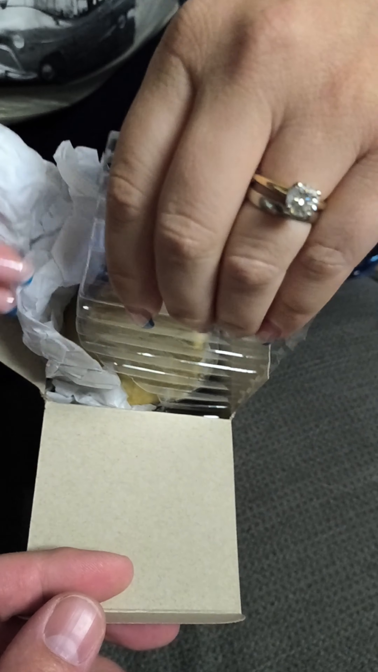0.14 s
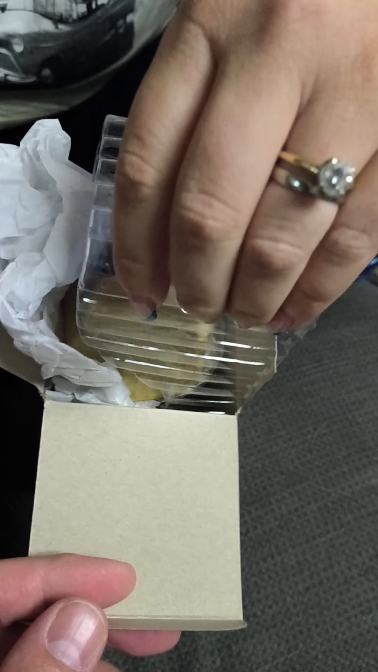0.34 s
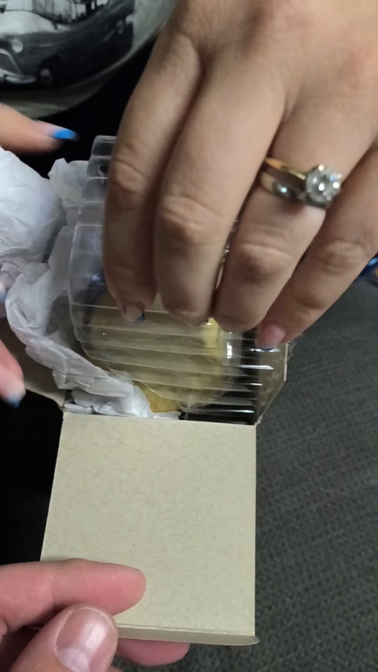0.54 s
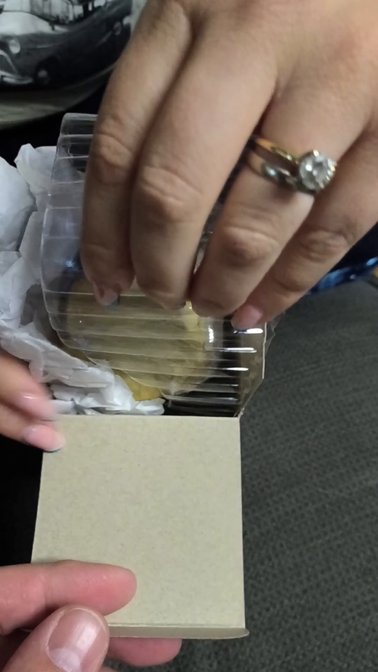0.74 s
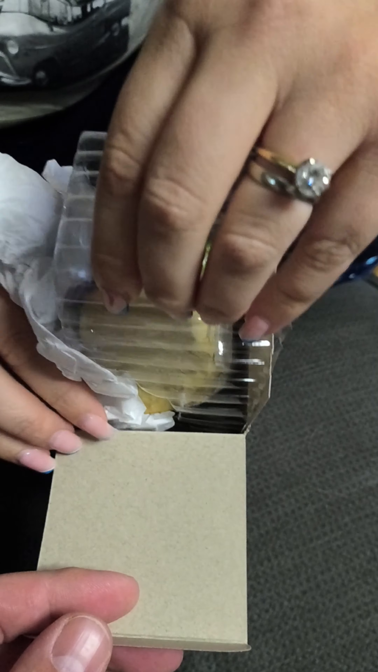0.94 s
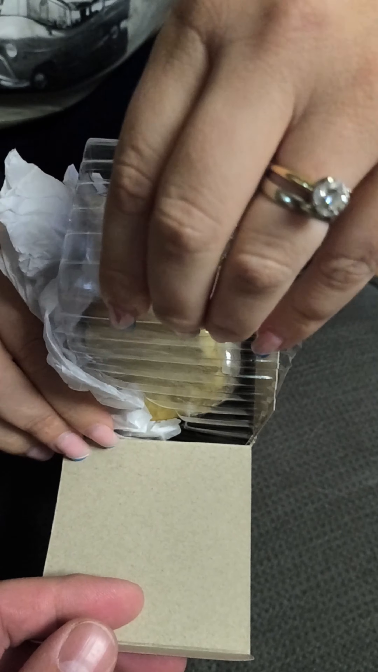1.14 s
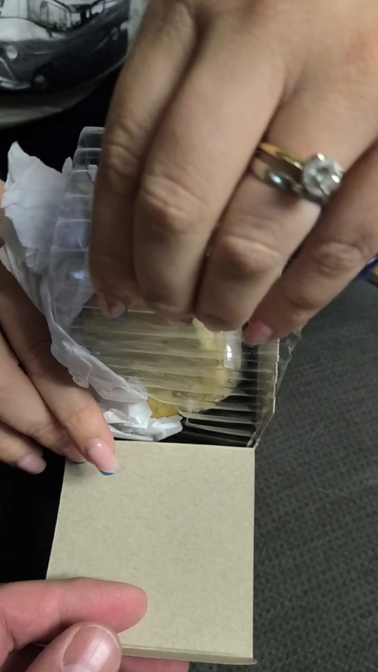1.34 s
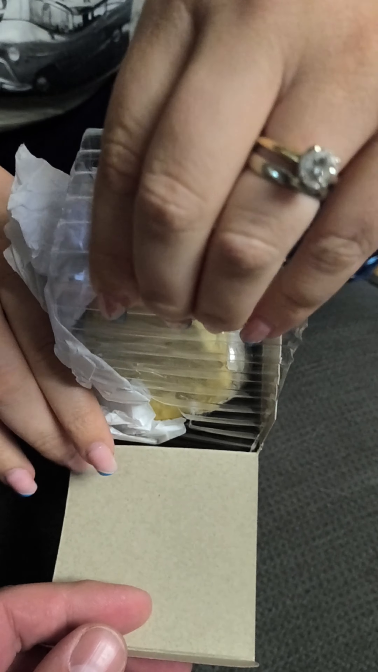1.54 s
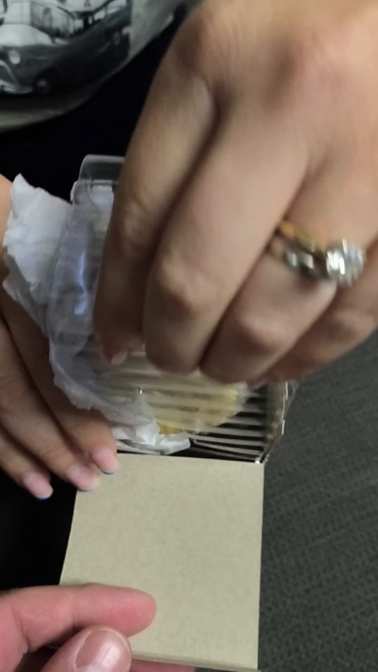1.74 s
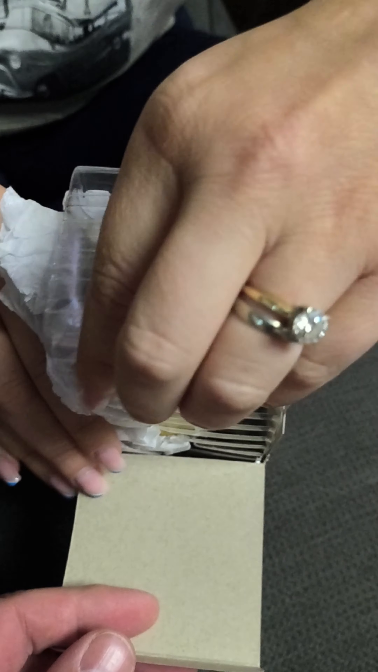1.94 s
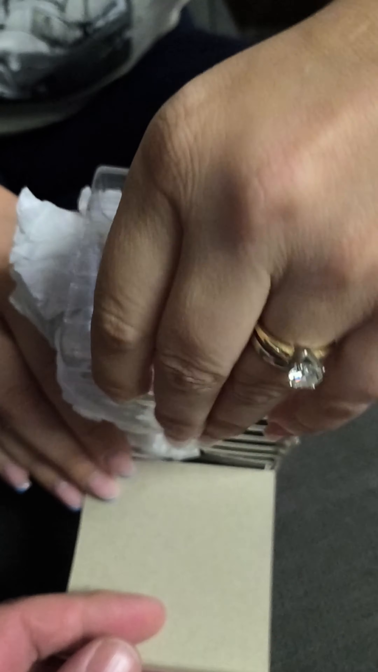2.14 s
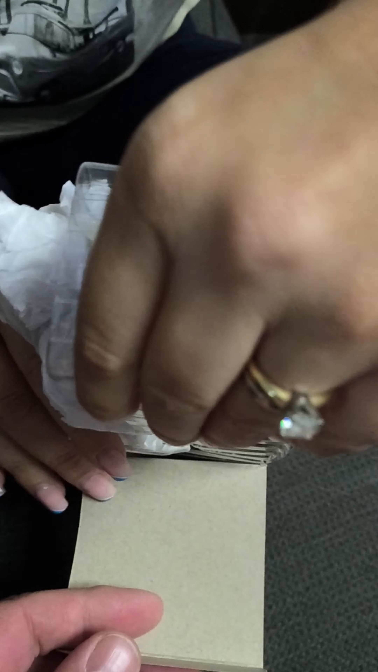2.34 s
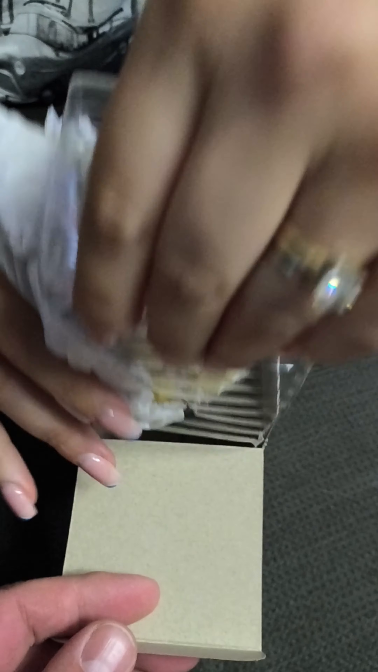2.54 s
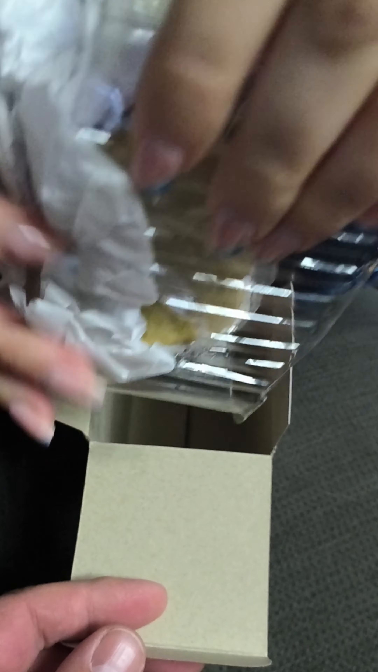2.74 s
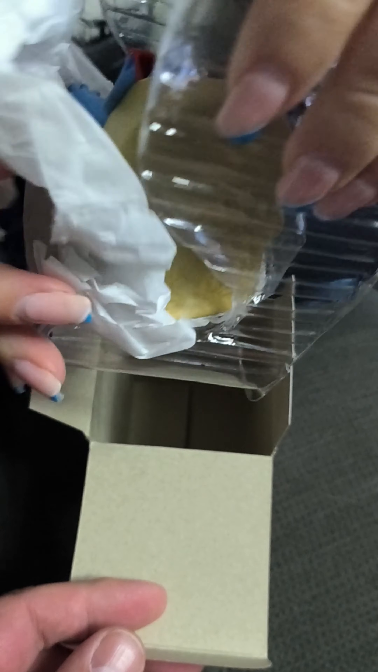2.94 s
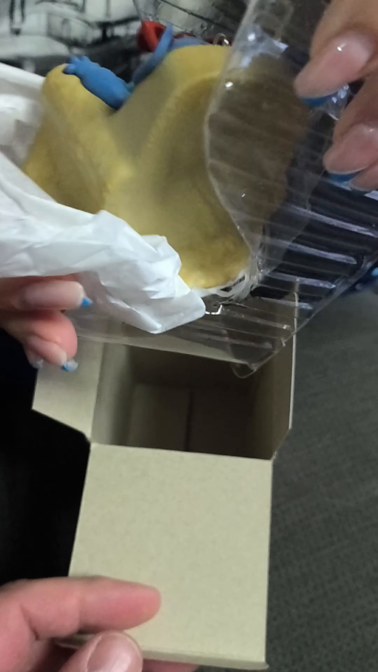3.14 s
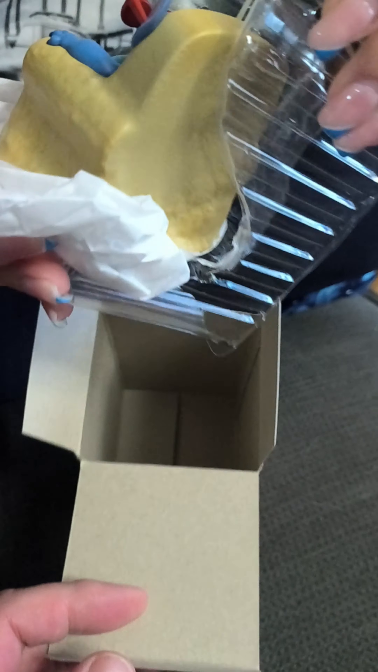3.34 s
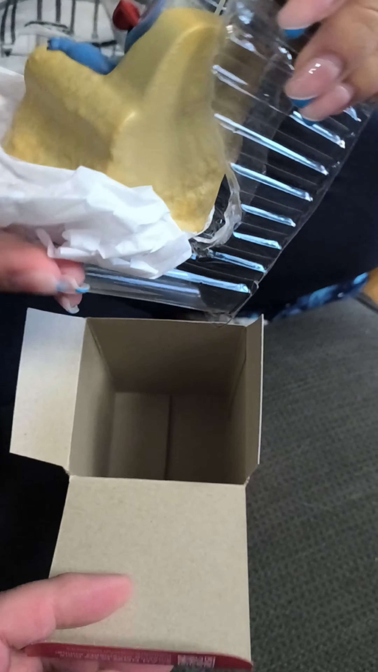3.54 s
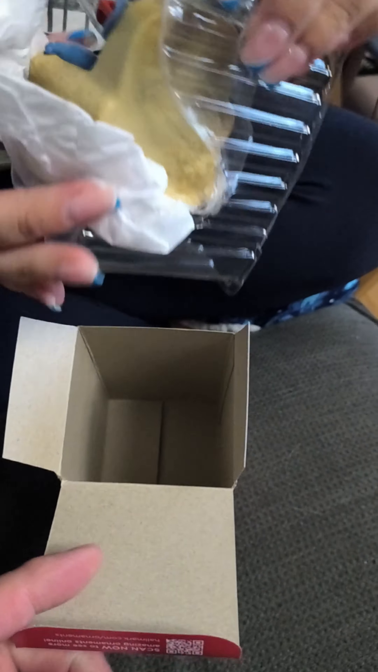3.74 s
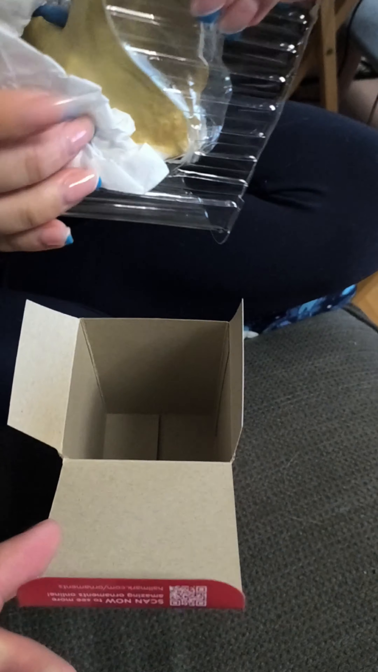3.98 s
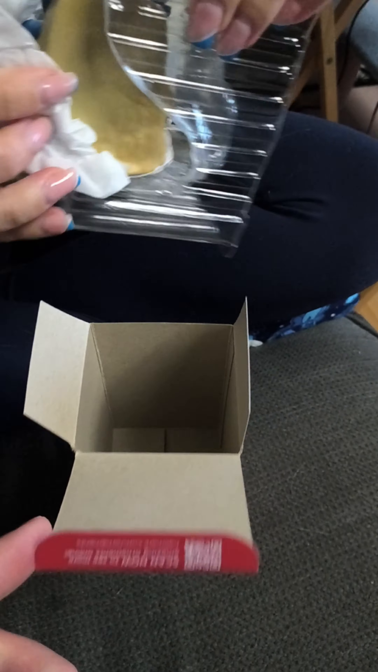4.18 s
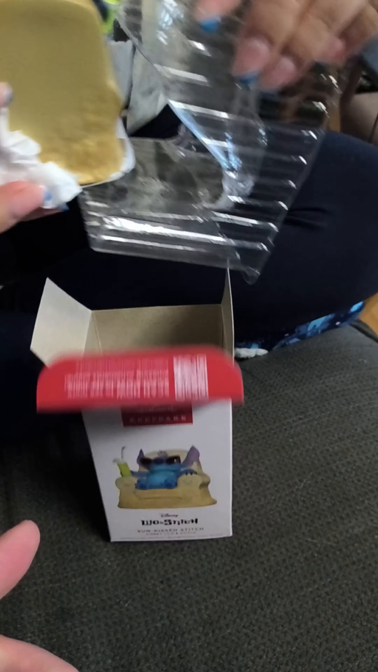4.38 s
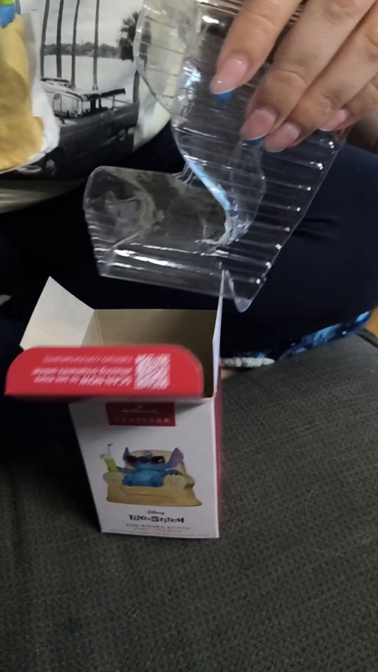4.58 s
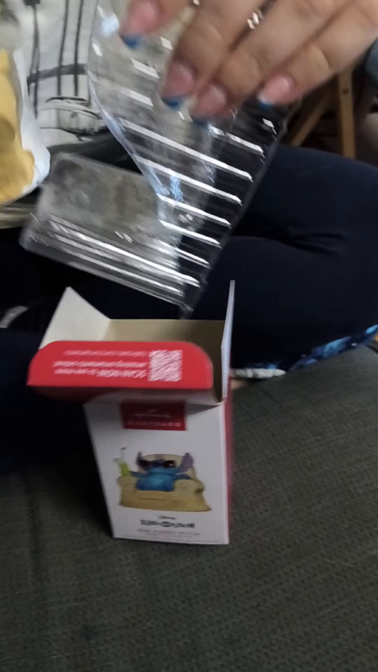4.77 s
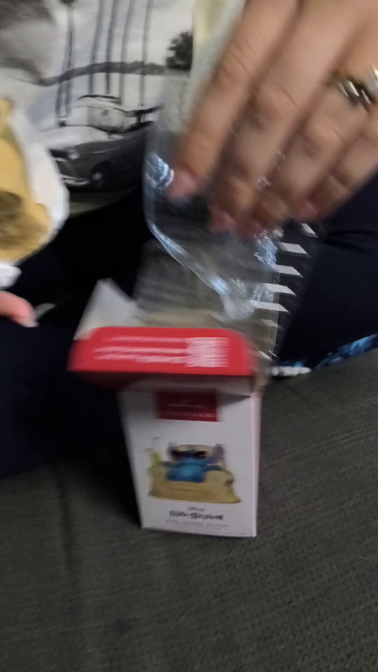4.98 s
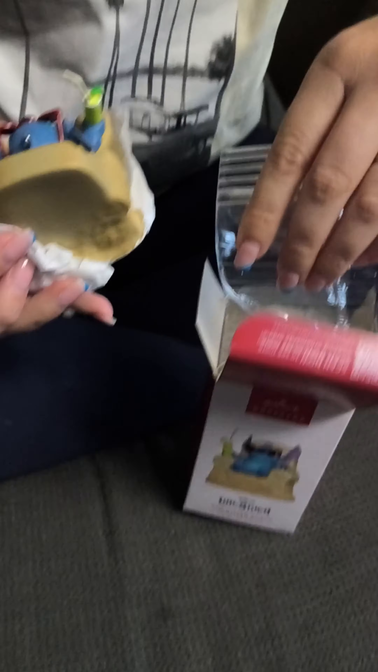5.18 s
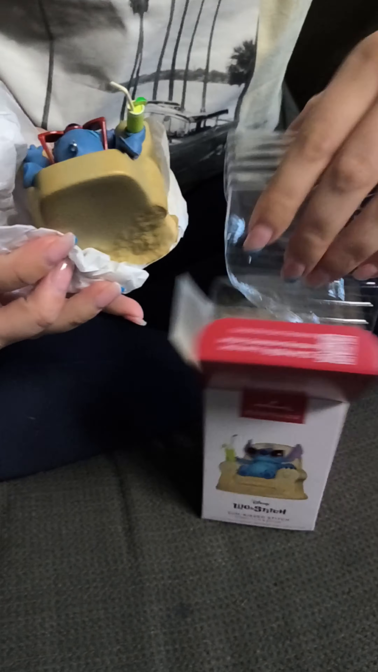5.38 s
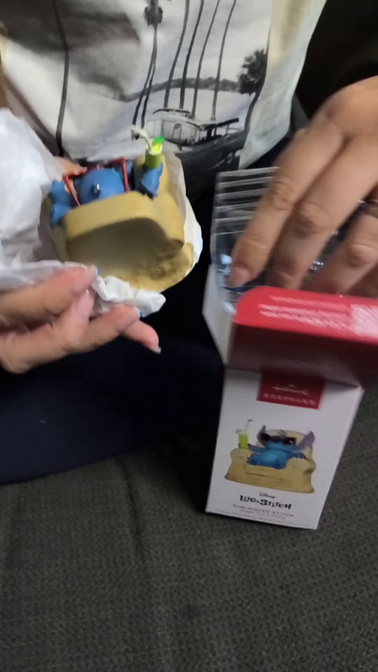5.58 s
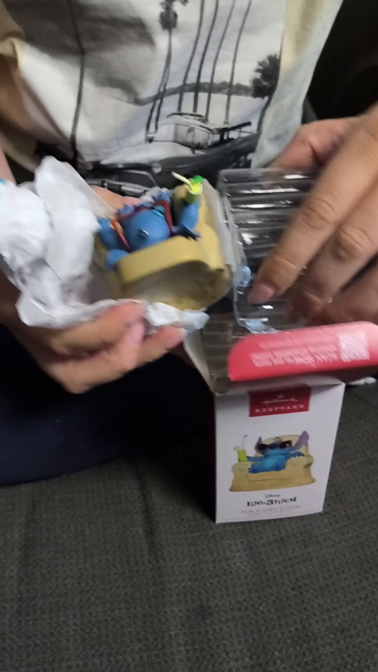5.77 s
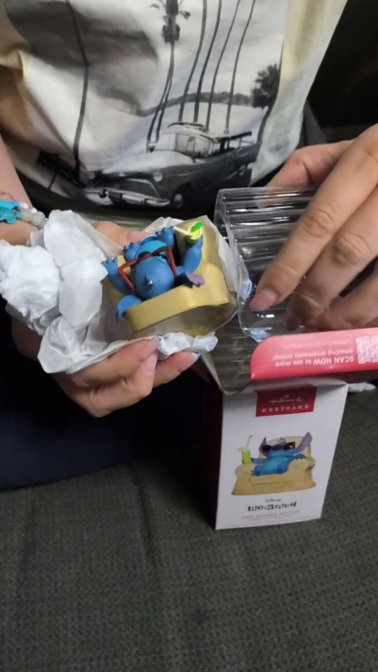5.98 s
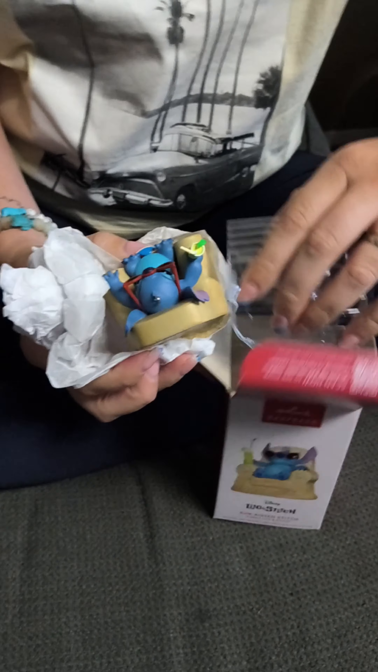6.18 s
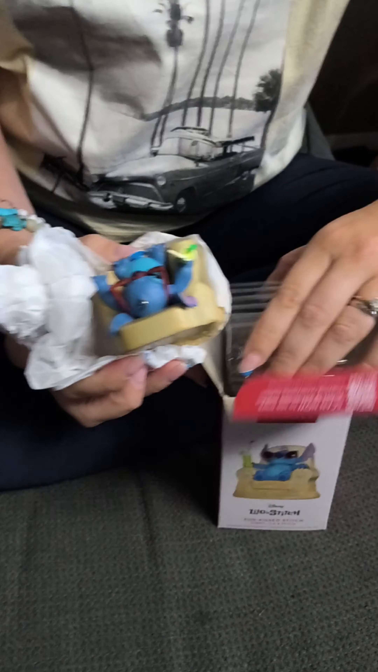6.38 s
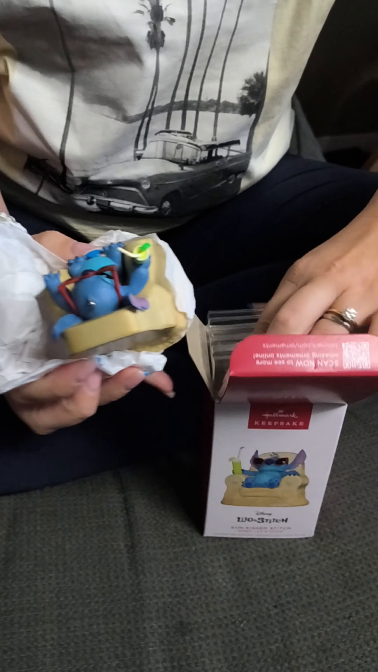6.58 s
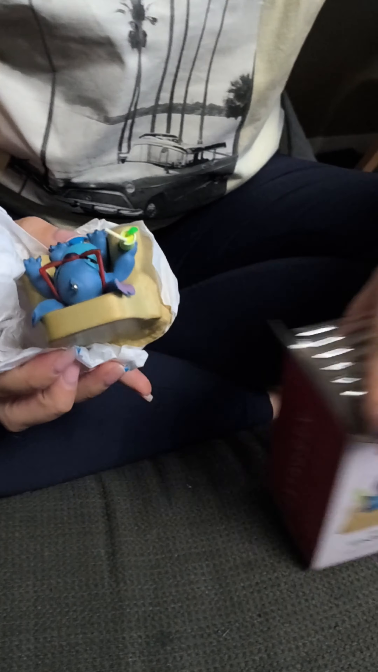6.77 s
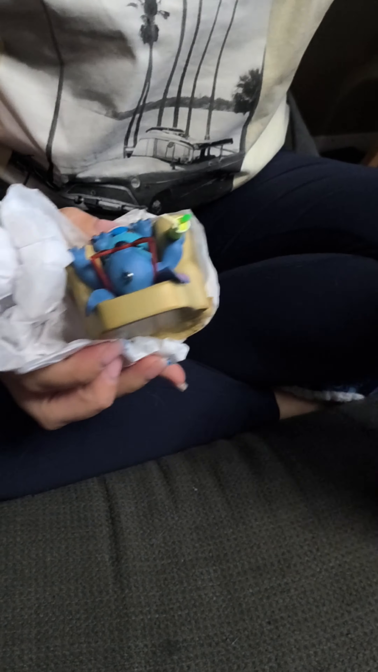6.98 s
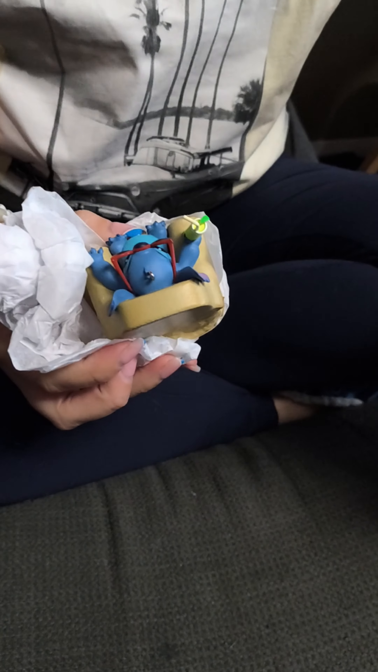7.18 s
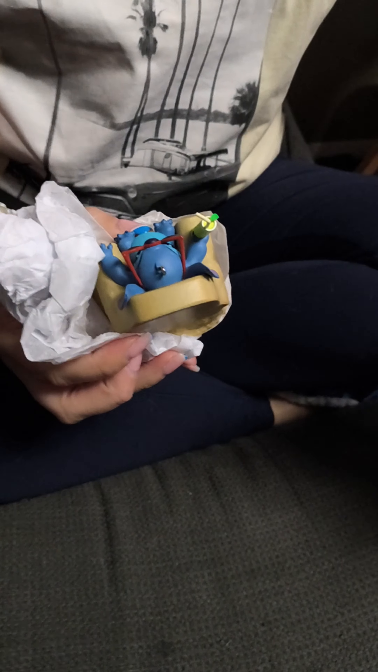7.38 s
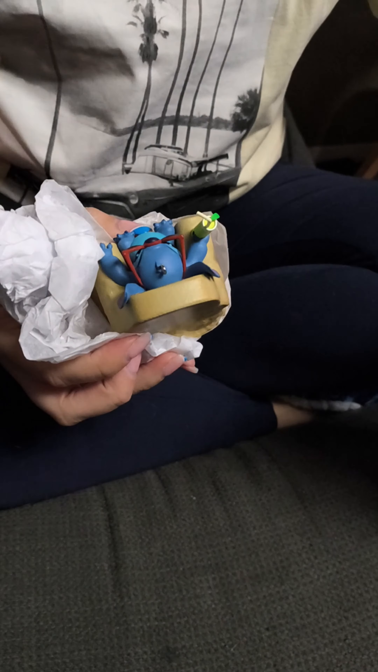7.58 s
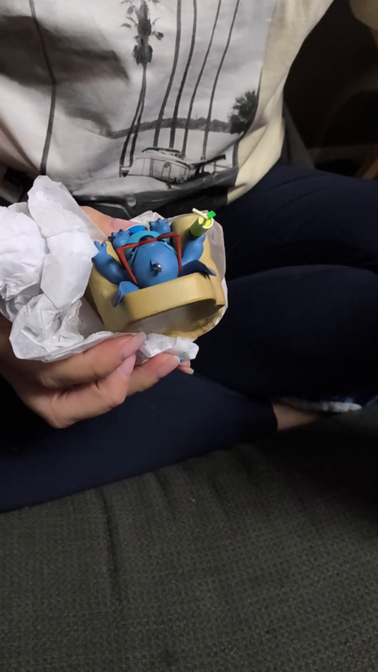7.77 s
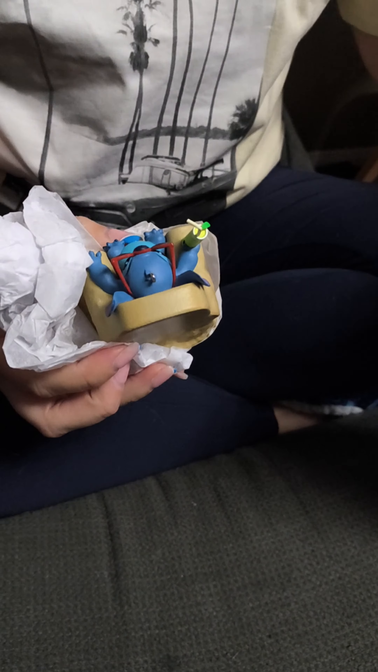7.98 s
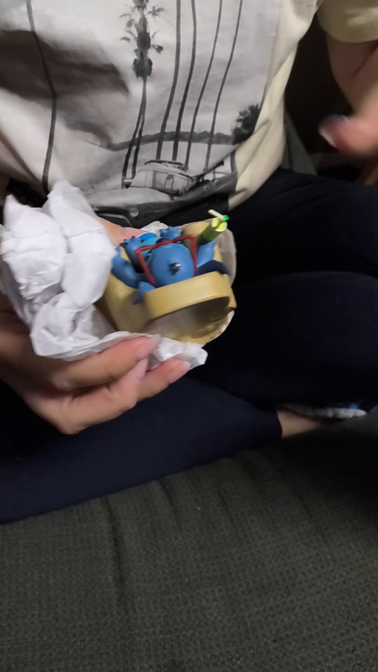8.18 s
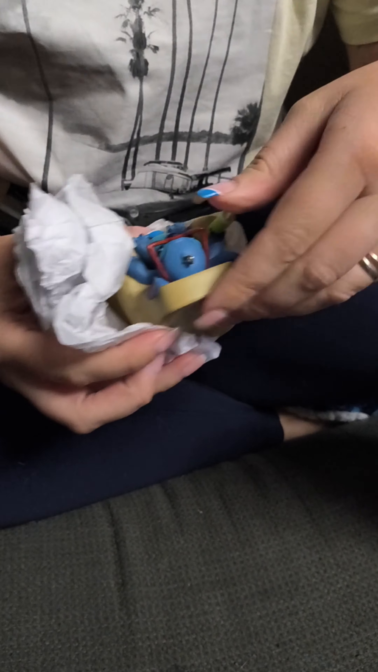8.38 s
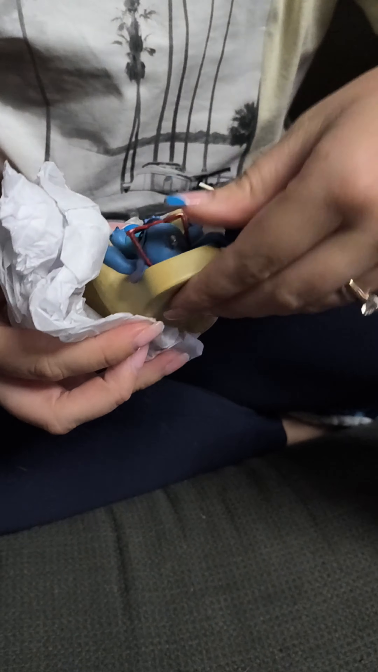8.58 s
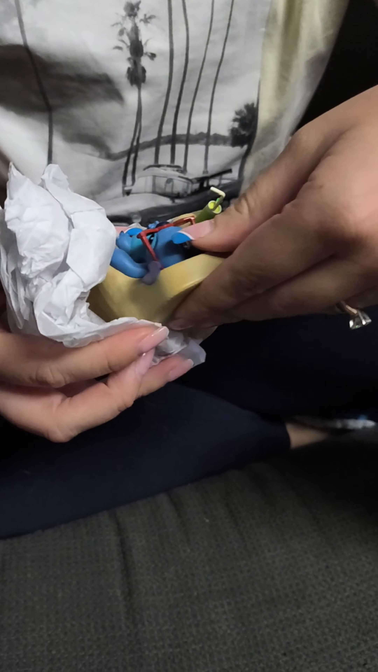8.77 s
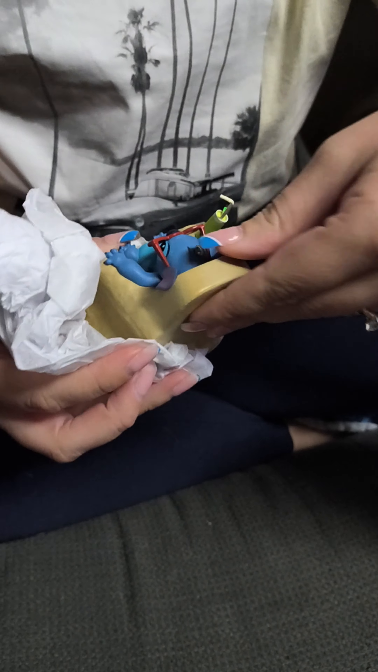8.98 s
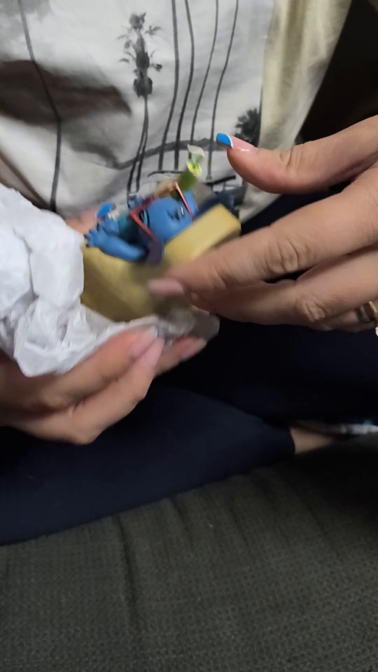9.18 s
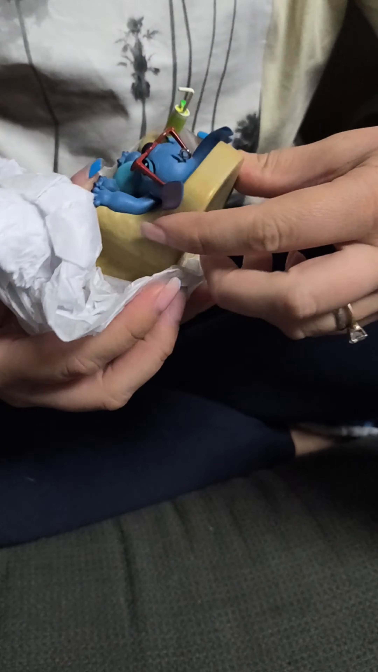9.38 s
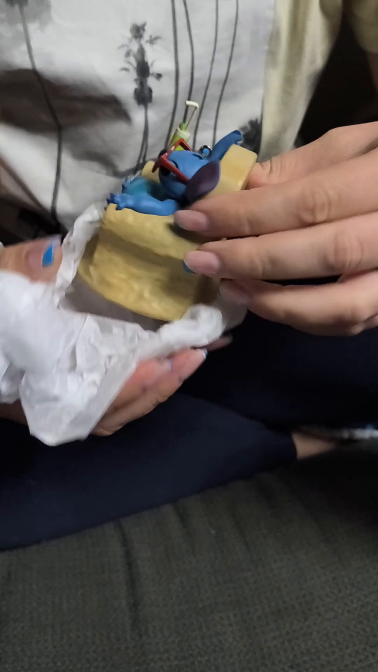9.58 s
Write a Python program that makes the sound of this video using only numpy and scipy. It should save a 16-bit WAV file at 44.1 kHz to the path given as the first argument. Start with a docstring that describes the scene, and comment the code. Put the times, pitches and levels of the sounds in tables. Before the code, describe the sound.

Hands scrape a plastic tray in a small hollow cardboard box while tissue paper crackles and snaps close by in a quiet room.

```python
"""Uneven scraping, rustling and sharp snaps close by: hands slide a ribbed plastic tray in and out of a small
cardboard box and crumple tissue paper, near a phone in a quiet, soft room. Rubbing forces drive the resonances
of the hollow box; the paper is clumped crackle with popping creases. Thin whistles are narrow gliding bands of
noise, soft bumps are short low swings, and a brief echo and wandering room tone lie behind."""
import sys
import numpy as np
from scipy import signal
from scipy.fft import rfft, irfft, next_fast_len
from scipy.io import wavfile
from scipy.ndimage import map_coordinates

SR = 44100
rng = np.random.default_rng(int(sys.argv[2]) if len(sys.argv) > 2 else 0)


def bounce(signal):
    """Save signal as a 16-bit WAV file at the path given by the first command-line argument."""
    frames = np.transpose(np.atleast_2d(signal))
    limited = np.clip(frames, -1, 1)
    pcm = np.round(limited * 32767).astype(np.int16)
    wavfile.write(sys.argv[1], SR, pcm)


N = 424233

# Resonances of the box with the tray half in [f/Hz, width/Hz, level/dB]
TRAY_HALF_IN = [(540, 84, -5), (640, 47, -3.5), (850, 300, -8.5), (1050, 230, -3.5), (1340, 140, -3),
                (1710, 150, -9.5), (2440, 50, -10.5), (3370, 430, -24.5)]
# Resonances of the box with the tray at its mouth [f/Hz, width/Hz, level/dB]
TRAY_AT_MOUTH = [(640, 250, -10), (1086, 150, -1), (1477, 87, -1), (2490, 200, -13.5), (3200, 290, -11.5)]
# Resonances of the box with the tray pushed home [f/Hz, width/Hz, level/dB]
TRAY_HOME = [(239, 62, -13.5), (663, 85, -4.5), (1000, 113, -4), (1070, 204, -6.5), (1448, 90, -6),
             (1604, 110, -8.5), (2400, 130, -15), (2850, 520, -16.5), (3610, 220, -11)]
# When the tray changes place, in the order of the three tables above [t/s]
TRAY_MOVES = [4.5, 5.9]
# Tone color of the tissue paper [f/Hz, level/dB]
PAPER_TONE = [(200, -28.5), (700, -16), (1500, -8.5), (2500, -6.5), (4500, 0), (7000, 1), (12000, -0.5),
              (16000, -6)]


def box():
    """The tray drives the hollow box by uneven scrapes, even squeaks and light rubbing."""
    return scrapes_and_pushes() + squeaks() + light_rubbing()


def scrapes_and_pushes():
    """The tray's ribs drag on the box in small irregular slips, each stroke favouring one mode of the box."""
    # Drags that weaken [t/s, length/s, level/dB, loudest mode f/Hz]
    scrape_rows = [(0.027, 0.014, -44.5, 540), (0.489, 0.013, -50, 1070), (0.752, 0.085, -51.5, 1330),
                   (0.809, 0.0012, -12.5, 1490), (0.845, 0.024, -45.5, 640), (0.896, 0.0028, -32, 1200),
                   (0.934, 0.048, -38.5, 1000), (1.031, 0.00078, -30.5, 770), (1.036, 0.052, -52, 900),
                   (1.081, 0.0053, -46, 1050), (1.168, 0.013, -46, 1050), (1.183, 0.033, -42, 1050),
                   (1.225, 0.041, -38.5, 1144), (1.374, 0.045, -39.5, 1060), (1.436, 0.16, -44, 1010),
                   (1.571, 0.013, -33, 1020), (1.594, 0.0076, -42, 1000), (1.634, 0.0065, -30.5, 950),
                   (1.655, 0.024, -34, 950), (1.69, 0.0068, -32, 1000), (1.697, 0.0035, -32.5, 970),
                   (1.827, 0.013, -48, 820), (1.857, 0.051, -46.5, 840), (1.913, 0.079, -45.5, 1050),
                   (1.986, 0.04, -41, 950), (2.055, 0.0024, -33.5, 1370), (2.179, 0.0086, -41, 1200),
                   (2.201, 0.002, -40.5, 1090), (2.299, 0.049, -48, 1110), (2.364, 0.07, -37.5, 1050),
                   (2.398, 0.025, -30.5, 1320), (2.439, 0.005, -22.5, 1285), (2.446, 0.037, -39.5, 556),
                   (2.558, 0.014, -36, 850), (2.569, 0.042, -41, 584), (2.674, 0.019, -52.5, 545),
                   (2.713, 0.022, -34, 1400), (3.059, 0.023, -45.5, 990), (3.34, 0.0026, -30.5, 800),
                   (3.467, 0.004, -33, 970), (5.008, 0.0048, -22, 1250), (5.158, 0.0064, -31.5, 1490),
                   (5.167, 0.014, -31, 1520), (5.227, 0.07, -40, 1460), (5.258, 0.0082, -29.5, 1450),
                   (5.287, 0.008, -49, 1410), (5.314, 0.077, -48, 1370), (5.413, 0.033, -51.5, 540),
                   (5.538, 0.019, -49, 1570), (5.61, 0.0094, -47.5, 1450), (5.651, 0.16, -47, 1370),
                   (5.707, 0.038, -32, 1420), (5.72, 0.07, -31, 1586), (5.771, 0.067, -42.5, 1270),
                   (5.956, 0.047, -53.5, 640), (6.005, 0.017, -41, 1340), (6.178, 0.0084, -47.5, 1660),
                   (6.2, 0.0071, -51, 1480), (6.224, 0.045, -32.5, 1370), (6.305, 0.052, -42, 1390),
                   (6.348, 0.11, -28, 1560), (6.421, 0.1, -29, 1450), (6.533, 0.015, -32.5, 970),
                   (6.537, 0.047, -34.5, 663), (6.606, 0.013, -33, 1550), (6.633, 0.0084, -37, 690),
                   (6.701, 0.037, -31, 667), (6.753, 0.029, -41, 624), (6.811, 0.01, -38.5, 1450),
                   (7.173, 0.0082, -35.5, 1500), (7.299, 0.0085, -36.5, 670), (7.308, 0.0051, -28, 1510),
                   (7.309, 0.004, -28.5, 640), (7.323, 0.0052, -29, 640), (7.338, 0.0022, -22.5, 1140),
                   (7.343, 0.0055, -32, 580), (7.354, 0.084, -54, 593), (7.415, 0.012, -35.5, 560),
                   (7.436, 0.008, -33.5, 1150), (7.451, 0.014, -33.5, 560)]
    # Drags that build up [t/s, length/s, level/dB, loudest mode f/Hz]
    push_rows = [(2.598, 0.12, -48.5, 1365), (6.649, 0.064, -48.5, 645), (7.365, 0.072, -52.5, 554)]
    scrape_sag_db, push_gain_db = 8, 5  # change of level until the stroke lets go
    table = np.array(scrape_rows + push_rows)
    sag_db = np.repeat([scrape_sag_db, -push_gain_db], [len(scrape_rows), len(push_rows)])[:, None]
    chance, size = rng.random((2, len(table), 8192))
    slips = (chance < 1200 / SR) * amp(0.88 * size)  # about 1200 slips a second
    force = slips + 0.17 * (size - .5)
    force[:, 60] += 4  # the first slip breaks the grip
    mode_hz = table[:, 3]

    def favoured(f):
        # a broad contact that drives a low mode is also softer, so duller
        softness = (1 + 1j * f / (3.5 * mode_hz[:, None])) ** 2
        return (1 + amp(8.0) * patch(f, mode_hz, 100)) / softness
    return strokes(table, sag_db, force, favoured)


def squeaks():
    """Regular slips, one a cycle at a slowly falling rate, give the box a pitched squeak."""
    # Even slips [t/s, length/s, level/dB, starting slip rate f/Hz]
    rows = [(1.535, 0.035, -33, 543)]
    table = np.array(rows)
    sag_db, slowing_per_s = 12.5, 1.17  # slowing: share of the starting rate lost each second
    t = np.arange(8192) / SR
    turns = table[:, 3:] * t * (1 - slowing_per_s * t / 2)
    slips = np.diff(np.floor(turns), prepend=-1)
    return strokes(table, sag_db, slips, lambda f: 1 / (1 + 1j * f / 1500))


def light_rubbing():
    """Light contact of tray and card makes fine crackle, coloured by the box with the tray in its current place."""
    # Strength of the contact, before the final gain [t/s, level/dB]
    contact = [(0, -69.5), (.75, -67), (1.04, -48), (1.3, -66.5), (1.52, -53), (2.25, -66), (2.47, -50),
               (2.54, -44), (2.85, -72.5), (3.29, -57), (4.66, -76.5), (5.09, -74.5), (5.25, -67.5),
               (6.05, -65), (6.45, -31), (6.6, -38), (6.78, -47), (6.9, -62), (7.42, -58), (7.85, -76),
               (9.62, -70)]
    contact_db, = curves(contact)
    touch = amp(contact_db) * crackle(rate=830, spread_db=2.2, clump_db=5.0, clump_rate=55, hiss=0.35)
    place = np.searchsorted(TRAY_MOVES, np.arange(N) / SR)
    murmur = sum(filtered(touch * (place == k), modes(table))
                 for k, table in enumerate((TRAY_HALF_IN, TRAY_AT_MOUTH, TRAY_HOME)))
    return amp(17.0) * murmur


def strokes(table, sag_db, force, favoured):
    """Each stroke starts quickly, changes in level and lets go, heard through the box at its own level."""
    start, length, db = table[:, :3].T[:, :, None]
    onset_share = 0.11  # longer strokes also start more slowly
    t = np.arange(force.shape[1]) / SR
    sag = sag_db * np.clip(t / length, 0, 1)
    let_go = 60 * np.clip(t - length, 0, 1) / 0.03  # 60 dB down in 0.03 s
    shape = amp(db - sag - let_go)
    shape = shape * (1 - np.exp(-t / (0.00026 + onset_share * length)))
    rung = hollow(shape * force, start[:, 0], favoured)
    level = np.sqrt(np.sum(shape ** 2, 1) / np.sum(rung ** 2, 1))
    return summed(start[:, 0], rung * level[:, None])


def hollow(rows, times, favoured):
    """Rows of force ring the box, whose modes depend on the tray's place and shift a little with each grip."""
    grip_shift = .03  # scatter of the box's pitch, as a share
    f = np.fft.rfftfreq(rows.shape[1], 1 / SR)
    tables = (TRAY_HALF_IN, TRAY_AT_MOUTH, TRAY_HOME)
    places = np.searchsorted(TRAY_MOVES, times)
    shifts = 1 + grip_shift * rng.standard_normal(len(rows))
    responses = np.array([modes(tables[k])(f * shift) for k, shift in zip(places, shifts)])
    return irfft(rfft(rows) * responses * favoured(f))


def modes(table):
    """Resonances summed with alternating sign, since a small box radiates little bass and has a gap in its modes."""
    floor_hz = 368  # the box radiates little below this
    gap_hz = 1950  # between the modes of the hollow and those of the walls

    def response(f):
        bass_cut = (1j * f / (1j * f + floor_hz)) ** 2
        gap = 1 - .8 * patch(f, np.array([gap_hz]), 470)[0]
        rings = sum((-1) ** k * amp(db) * patch(f, np.array([hz]), width)[0]
                    for k, (hz, width, db) in enumerate(table))
        return bass_cut * gap * rings
    return response


def patch(f, hz, width_hz):
    """One resonance of peak gain 1 for each row."""
    return 1j * f * width_hz / (hz[:, None] ** 2 - f * f + 1j * f * width_hz)


def paper():
    """Bending tissue gives a clumped rustle with popping creases; its low part follows the size of what rustles."""
    # Gain of the low part: the size of what rustles [t/s, level/dB]
    body = [(0, 10.5), (2.7, 1), (3, 9), (4.5, 4), (5.1, 13.5), (7.6, 8.5), (8.2, 2), (8.9, -11),
            (9.08, 2.5), (9.45, 8), (9.62, 9)]
    grip = squeezing()
    both = grip * fine_rustle() + crease_pops(grip)
    low = filtered(both, lambda f: 1 / (1 + (f / 2600) ** 4))
    return both + (amp(curves(body)[0]) - 1) * low


def fine_rustle():
    """Many small creases make clumped crackle, coloured by broad resonances of the plastic tray."""
    # Broad resonances of the plastic tray that colour the rustle [f/Hz, width/Hz, level/dB]
    tray_modes = [(3070, 280, -0.5), (3480, 410, -1), (4270, 130, -4), (5500, 550, 0.5), (7200, 740, 3.5)]
    fine = crackle(rate=2000, spread_db=2.4, clump_db=2.8, clump_rate=110, hiss=0.35)
    hz, width, db = np.transpose(tray_modes)
    fine = filtered(fine, lambda f: 1 + amp(db) @ patch(f, hz, width[:, None]))
    return unit(filtered(fine, causal(PAPER_TONE)))


def squeezing():
    """Gain of the rustle: each squeeze swells, holds and fades, over the slow shifting of the paper."""
    # Fingers close on the paper [t/s, hold/s, level/dB]
    squeezes = [(0.009, 0.031, -38), (0.182, 0.14, -42), (0.609, 0.093, -46.5), (0.818, 0.049, -50.5),
                (0.93, 0.036, -45.5), (1.037, 0.019, -39.5), (1.186, 0.072, -45), (1.409, 0.14, -48),
                (1.667, 0.016, -59.5), (1.828, 0.11, -53), (2.403, 0.034, -37), (2.574, 0.48, -53.5),
                (2.747, 0.2, -51.5), (2.941, 0.019, -39.5), (3.064, 0.008, -35.5), (3.1, 0.048, -38.5),
                (3.207, 0.043, -38.5), (3.396, 0.061, -38.5), (3.908, 0.039, -48.5), (4.205, 0.015, -49.5),
                (4.32, 0.055, -57), (4.84, 0.0088, -60.5), (4.994, 0.0091, -59.5), (5.175, 0.0067, -53),
                (5.26, 0.072, -53.5), (5.724, 0.046, -37), (5.96, 0.09, -62.5), (6.182, 0.018, -55),
                (6.253, 0.012, -34), (6.361, 0.18, -31), (6.614, 0.032, -44), (6.714, 0.012, -41.5),
                (7.173, 0.0086, -52.5), (7.336, 0.008, -36), (7.426, 0.016, -35.5), (8.528, 0.01, -45.5),
                (8.783, 0.024, -59), (8.992, 0.088, -46), (9.088, 0.12, -55.5), (9.24, 0.093, -55.5),
                (9.62, .03, -34.5)]
    # Paper shifting between squeezes [t/s, level/dB]
    shifting = [(0, -50.5), (.5, -49.5), (.77, -63), (1.3, -72), (1.6, -61), (2.35, -71), (2.85, -52),
                (3.2, -44), (3.5, -44), (4.37, -50), (4.65, -72.5), (5.1, -83.5), (5.4, -66), (6.12, -81),
                (6.75, -49.5), (7.1, -91), (8.01, -91.5), (8.9, -66.5), (9.62, -73)]
    swell_db_per_s, fade_db_per_s = 479, 451
    t = np.arange(0, N, 64) / SR  # a coarse time line is enough
    start, hold, db = np.transpose(squeezes)[:, :, None]
    swell = swell_db_per_s * np.clip(start - t, 0, 9)
    fade = fade_db_per_s * np.clip(t - start - hold, 0, 9)
    power = np.sum(amp(db - swell - fade) ** 2, 0)
    squeezed = np.interp(np.arange(N) / SR, t, power)
    return np.sqrt(squeezed + amp(curves(shifting)[0]) ** 2)


def crease_pops(grip):
    """A breaking crease is a sharp click with a few ms of noise; small ones follow the strength of the rustle."""
    # Larger creases, peak before the gain of the low part [t/s, level/dB, f/Hz]
    snaps = [(0.0163, -33, 4960), (.17, -17.5, 7200), (0.72, -28.5, 6200), (0.8132, -4.5, 7730),
             (0.897, -36, 5690), (1.0345, -26, 2970), (1.281, -36, 4870), (1.4027, -37, 3730),
             (1.5194, -18, 6950), (1.6914, -27, 2400), (1.8082, -35, 6660), (1.831, -33, 6540),
             (1.856, -26, 2440), (2.027, -41, 6800), (2.057, -37, 2700), (2.0837, -34, 5230),
             (2.184, -35.5, 5300), (2.374, -27.5, 2400), (2.4125, -10.5, 2560), (2.441, -9, 6340),
             (2.561, -33, 2440), (2.9546, -22.5, 6960), (3.157, -25.5, 3540), (3.204, -32.5, 2400),
             (3.276, -15.5, 2290), (3.3428, -36, 2300), (3.474, -15.5, 7050), (3.516, -27, 4940),
             (3.9357, -28.5, 7260), (3.954, -20.5, 6130), (4.104, -34, 6000), (4.1846, -29, 6270),
             (4.2941, -24, 6300), (4.508, -40.5, 6240), (4.6097, -42, 6700), (4.8345, -29.5, 6600),
             (5.16, -35, 5340), (5.175, -29.5, 7170), (5.2566, -33, 3540), (5.288, -16, 5200),
             (5.723, -24.5, 3050), (6.0177, -27, 5180), (6.0694, -36.5, 5370), (6.1847, -30, 4760),
             (6.2018, -23.5, 1950), (6.235, -22.5, 2220), (6.257, -21.5, 1990), (6.349, -16, 3730),
             (6.443, -11, 3000), (6.461, -14, 2970), (6.615, -28.5, 4040), (6.7224, -30.5, 2580),
             (6.8136, -22, 2700), (7.177, -28.5, 5100), (7.3085, -27.5, 3180), (7.341, -15, 3020),
             (7.417, -31.5, 3200), (7.4516, -17, 3450), (7.483, -31.5, 2710), (8.333, -49.5, 6950),
             (8.432, -46, 6900), (8.524, -24, 7100), (8.533, -22.5, 7330), (8.6175, -34, 7100),
             (8.762, -50.5, 6800), (8.784, -36.5, 6850), (8.937, -37.5, 7050), (8.975, -31, 5500),
             (8.994, -29, 5750), (9.0135, -34, 5900), (9.182, -29.5, 7540), (9.2357, -30.5, 6960),
             (9.272, -35, 6500), (9.2917, -31.5, 3470), (9.597, -30, 5900)]
    count, over_rustle_db, spread_db = 900, 7.5, 1.5  # the small creases
    when, size, tone = rng.random((count, 3)).T
    local_db = 20 * np.log10(grip[(when * N).astype(int)])
    small_db = local_db + over_rustle_db - spread_db * np.log(size + .02)
    small = [when * N / SR, small_db, 2300 + 5000 * tone]
    start, db, hz = np.hstack([np.transpose(snaps), small])
    t = np.arange(2048) / SR
    shape = amp(-60 * t / 0.0077) * (1 - np.exp(-t / 0.0012)) ** 2
    pops = shape * rng.standard_normal((len(start), len(t)))
    pops[:, 60] += .7  # the crease breaks with a sharp click
    f = np.fft.rfftfreq(len(t), 1 / SR)
    own_tone = 1 + amp(16) * patch(f, hz, 220)
    brighter = 1 + 1j * f / 11000
    pops = irfft(rfft(pops) * causal(PAPER_TONE)(f) * own_tone * brighter)
    pops = pops / np.abs(pops).max(axis=1)[:, None]
    return summed(start, amp(db[:, None]) * pops)


def whistles():
    """A fingertip gliding on smooth plastic hisses in one narrow band that changes pitch."""
    # Glides [start t/s, end t/s, start f/Hz, end f/Hz, level/dB]
    slides = [(2.087, 2.367, 5130, 5580, -56), (7.605, 7.837, 2400, 2580, -70),
              (8.785, 8.848, 3200, 3070, -59.5)]
    t, out = np.arange(N) / SR, np.zeros(N)
    for start, end, from_hz, to_hz, db in slides:
        pitch_hz = np.interp(t, [start, end], [from_hz, to_hz])
        carrier = np.cos(2 * np.pi * np.cumsum(pitch_hz) / SR)
        gate = np.clip(np.minimum(t - start, end - t) / 0.0097, 0, 1)
        hiss = unit(wobble(650))  # slow noise that widens the tone into a band
        out += amp(db) * gate * hiss * carrier
    return out


def bumps():
    """Each soft bump on the cushion is a couple of low swings that swell and die."""
    # Bumps, level before the swelling shape [t/s, level/dB, f/Hz]
    rows = [(0.031, -43, 355), (1.03, -41, 334), (1.998, -43, 143), (2.346, -47.5, 122), (2.541, -45, 142),
            (5.726, -46, 204), (6.221, -50, 157), (6.434, -37.5, 230), (6.717, -46, 177), (7.294, -49, 148),
            (9.341, -54, 87), (9.379, -51, 39.1), (9.427, -58, 64.3)]
    start, db, hz = np.transpose(rows)
    turns = hz[:, None] * np.arange(SR // 4) / SR
    shape = turns * np.exp(-turns / 1.23)
    return summed(start, amp(db[:, None]) * shape * np.sin(2 * np.pi * turns))


def placed(x, spread):
    """The left port hears the hands first; scattered treble reaches each port differently."""
    # Place of the hands [t/s, left over right level/dB, lead of the left/samples]
    place = [(0, -1, 9.3), (.7, 1, 8), (1.2, 0, 3.04), (2.7, -0.5, 3.2), (2.85, 3, 14.6), (4.7, 1, 13.5),
             (5.3, 1, 3.2), (6.8, 0, 3.96), (7.3, -1, 3.4), (8.2, -3.5, 9.8), (8.7, -4.5, 9.7),
             (9.62, 0, 9.5)]
    # Effect of the phone's body [f/Hz, left over right level/dB]
    shadow = [(300, 0.5), (1200, 5), (2500, 1.5), (5000, -3), (12000, -1)]
    pan_db, lead = curves(place)
    direct = np.array([map_coordinates(x, [np.arange(N) + side * lead / 2]) for side in (1, -1)])
    z = signal.stft(x, nperseg=64)[2]
    random_phase = np.exp(2j * np.pi * rng.random((2,) + z.shape))
    scattered = signal.istft(z * random_phase, nperseg=64)[1][:, :N]
    both = direct + spread * filtered(scattered, lambda f: f * f / (f * f + 2300 ** 2))
    both = filtered(both, lambda f: amp([along(shadow, f) / 2, -along(shadow, f) / 2]))
    return both * amp([pan_db / 2, -pan_db / 2])


def ringing(x, share, t60):
    """Bent sheets ring briefly in dense modes that change whenever the hands reshape them."""
    hop = 4096  # a new random ring each hop, crossfaded
    starts = np.arange(0, N, hop)
    padded = np.pad(x, ((0, 0), (hop, 2 * hop)))
    parts = padded[:, starts[:, None] + np.arange(2 * hop)] * np.hanning(2 * hop)
    t = np.arange(hop) / SR
    ring = rng.standard_normal((len(starts), hop)) * amp(-60 * t / t60)
    ring = share * ring / np.linalg.norm(ring, axis=1)[:, None] + (t == 0)  # t == 0 keeps the direct sound
    rung = irfft(rfft(parts, 4 * hop) * rfft(ring, 4 * hop))
    return np.array([summed(starts / SR, side, N + hop)[hop:] for side in rung])


def room(x):
    """A short soft-furnished tail of noise, each frequency dying at its own speed."""
    # Time to fall by 60 dB [f/Hz, t/s]
    decay = [(200, 0.25), (2000, 0.082), (10000, 0.0078)]
    hz, t, z = signal.stft(rng.standard_normal((2, SR // 4)), SR, nperseg=256)
    fading = amp(-60 * t / along(decay, hz)[:, None])
    tail = signal.istft(z * fading, SR, nperseg=256)[1]
    delayed = np.pad(x, (200, 0))[None]
    return signal.fftconvolve(delayed, tail / np.linalg.norm(tail[0]), axes=1)[:, :N]


def air():
    """Room tone is shaped noise, its low part wandering in level under faint steady microphone hiss."""
    # Relative spectrum of the room tone [f/Hz, level/dB per Hz]
    spectrum = [(20, -19), (50, -4), (120, 4), (200, -4.5), (400, -10.5), (700, -35), (2000, -26),
                (5000, -32.5), (7000, -33.5), (11000, -15), (16000, -13.5)]
    # Likeness of left and right, 1 = the same [f/Hz, likeness]
    likeness = [(60, 0.88), (500, 0.79), (2000, 0.052), (6000, 0.0088)]

    def mid_and_side(f):
        turn = np.arccos(np.clip(along(likeness, f), -1, 1)) / 2
        return amp(along(spectrum, f)) * [np.cos(turn), np.sin(turn)]
    mid, side = filtered(rng.standard_normal((2, N)), mid_and_side)
    tone = unit([mid + side, mid - side] * amp([[.8], [-.8]]))
    low = filtered(tone, lambda f: 1 / (1 + (f / 500) ** 4))
    wander_db = 1.8 * wobble(2.5) + 3.2 * wobble(14)
    return amp(-62.0) * (tone - low + amp(wander_db - 7.5) * low)


def crackle(rate, spread_db, clump_db, clump_rate, hiss):
    """Tiny slips of uneven size (rate a second) come in clumps, mixed with a share of smooth hiss."""
    sizes = amp(spread_db * rng.exponential(size=N)) * rng.standard_normal(N)
    slips = (rng.random(N) < rate / SR) * sizes
    mix = np.sqrt(1 - hiss) * unit(slips) + np.sqrt(hiss) * rng.standard_normal(N)
    return unit(mix * amp(clump_db * wobble(clump_rate)))


def amp(db):
    """Gain of a dB value."""
    return 10 ** (np.asarray(db) / 20)


def unit(x):
    """x scaled to an average strength (rms) of 1."""
    return x / np.sqrt(np.mean(x ** 2) + 1e-20)


def along(points, hz):
    """Values between (Hz, value) points, on a log frequency axis."""
    f, v = np.transpose(points)
    return np.interp(np.log(hz + 1), np.log(f + 1), v)


def curves(rows):
    """One value per sample for each column after the time."""
    s, *cols = np.transpose(rows)
    return [np.interp(np.arange(N) / SR, s, c) for c in cols]


def wobble(rate):
    """A smooth random curve through `rate` random points a second."""
    return map_coordinates(rng.standard_normal(int(N * rate / SR) + 4), [np.arange(N) * rate / SR])


def filtered(x, response):
    """x with each frequency multiplied by response(Hz)."""
    m = 2 * next_fast_len(N // 2 + SR // 4)
    return irfft(rfft(x, m) * response(np.fft.rfftfreq(m, 1 / SR)), m)[..., :N]


def causal(points):
    """A filter with the gain of (Hz, dB) points that never sounds ahead of its input (minimum phase)."""
    def response(hz):
        c = irfft(np.log(amp(along(points, hz))))
        c[1:len(c) // 2] *= 2
        c[len(c) // 2 + 1:] = 0
        return np.exp(rfft(c))
    return response


def summed(times, rows, length=N):
    """Rows added up along the time line from their start times in seconds."""
    where = np.round(times * SR).astype(int)[:, None] + np.arange(rows.shape[1])
    return np.bincount(where.ravel(), rows.ravel(), N + SR)[:length]


def scene():
    """Box and paper at the hands, thin whistles, bumps slightly left of the middle, the room around."""
    hands = box() + paper()
    near = ringing(placed(hands, spread=2.166), share=0.65, t60=0.032)
    echo = amp(-18) * room(hands)
    thuds = bumps() * amp([[.8], [-.8]])
    return amp(-3.5) * near + echo + placed(whistles(), spread=0) + thuds + air()


def record(dry):
    """The microphone lifts the bass, dips near 9 kHz, is duller above, and keeps nothing over its band limit."""
    # Response of the microphone [f/Hz, level/dB]
    mic = [(100, 14), (7300, -0.5), (8100, -9.5), (8800, -16), (9500, -9.5), (15300, -7.5), (15700, -53.5)]
    top_hz = 16400
    return filtered(filtered(dry, causal(mic)), lambda hz: hz < top_hz)


dry = scene()
out = record(dry)
bounce(out)
```